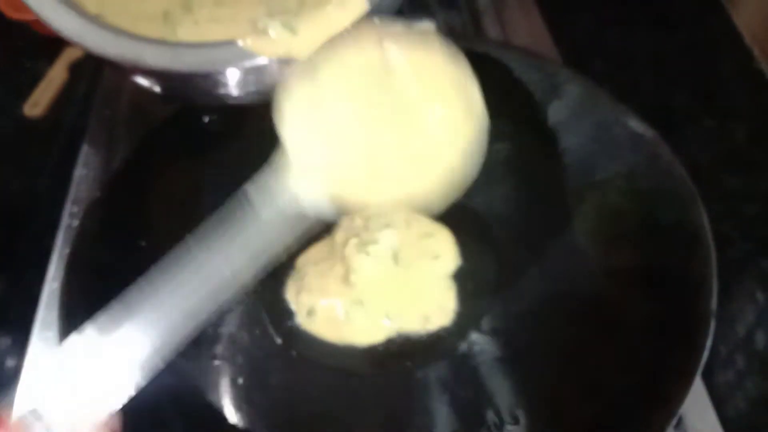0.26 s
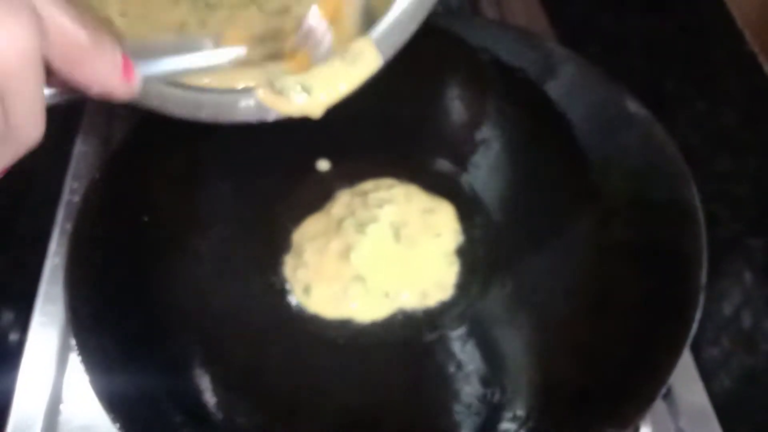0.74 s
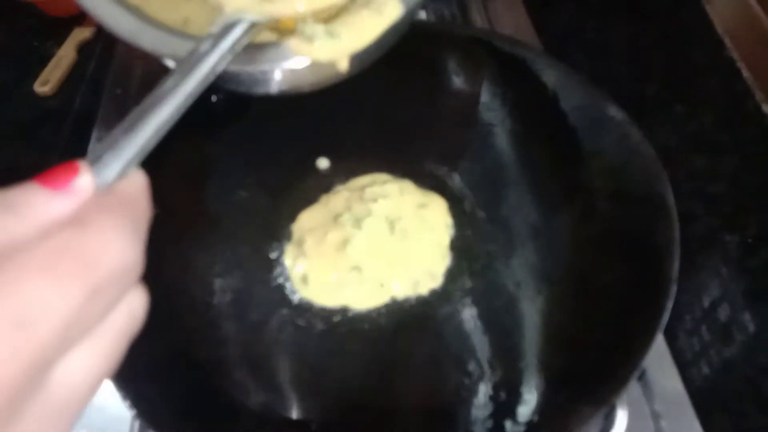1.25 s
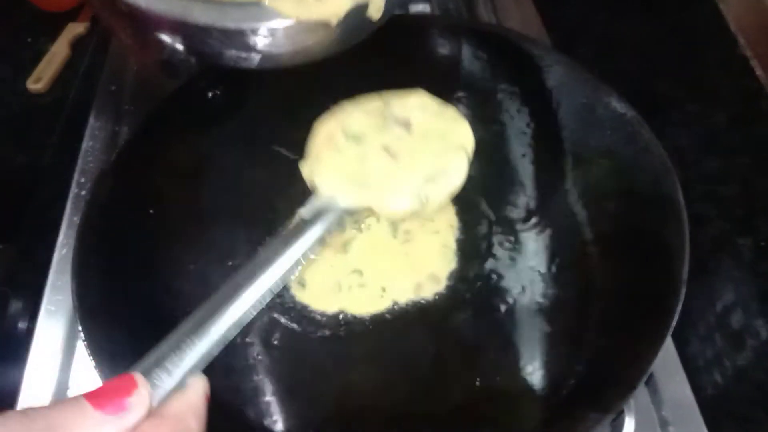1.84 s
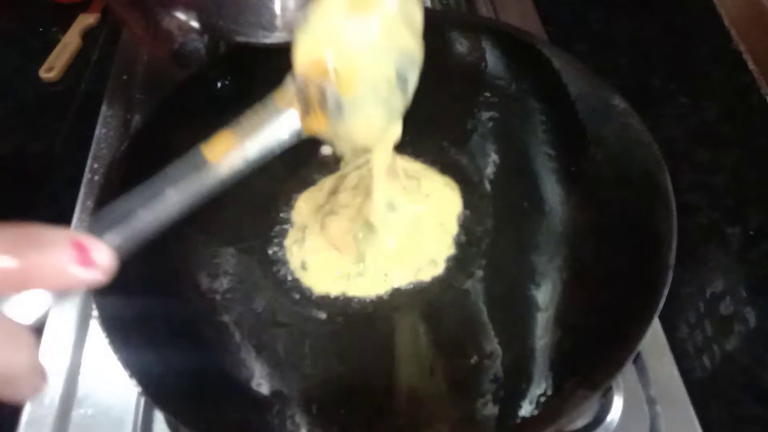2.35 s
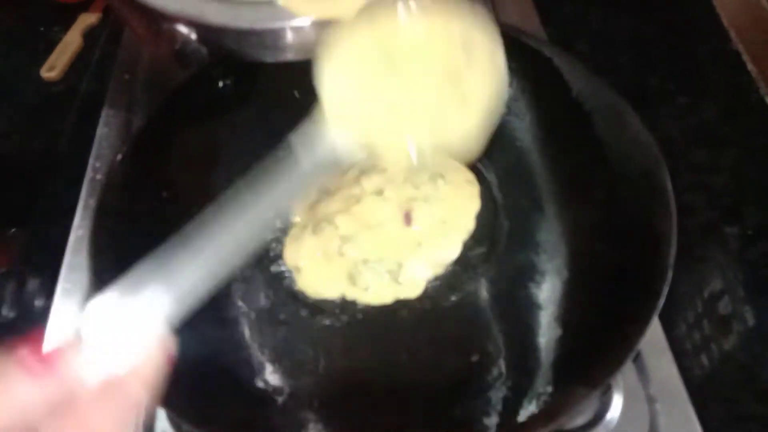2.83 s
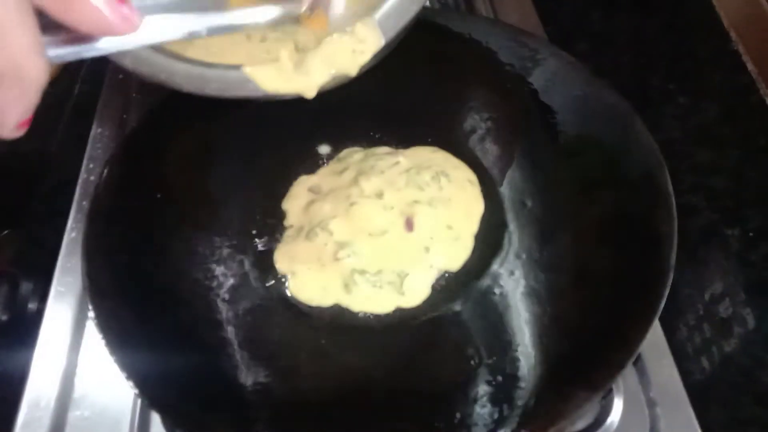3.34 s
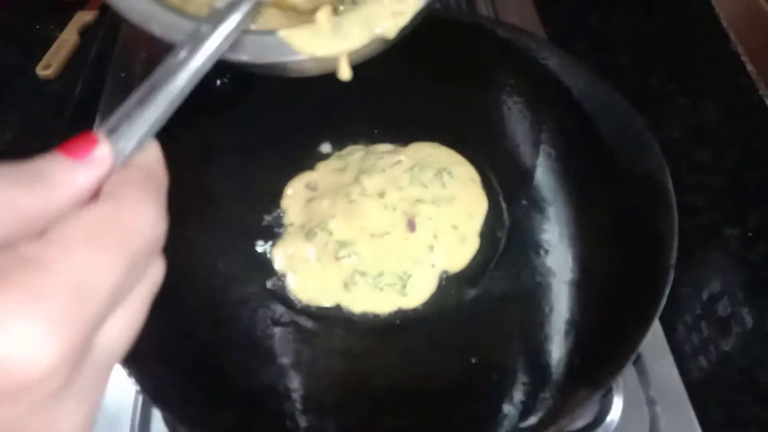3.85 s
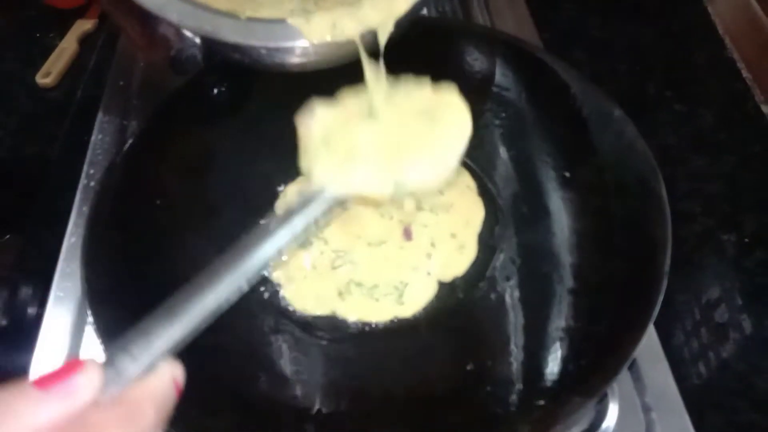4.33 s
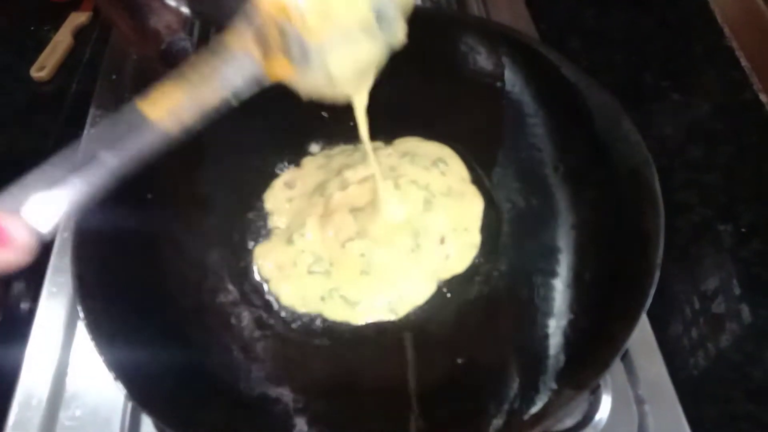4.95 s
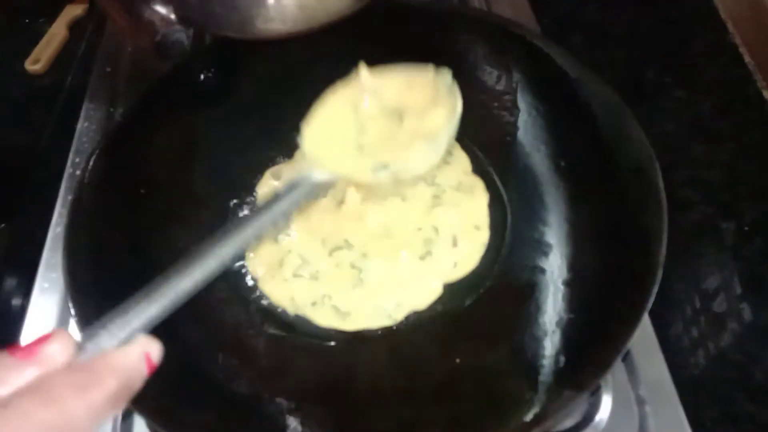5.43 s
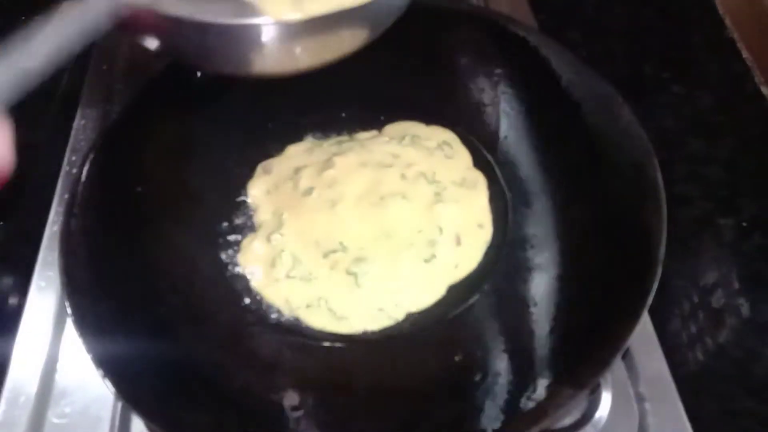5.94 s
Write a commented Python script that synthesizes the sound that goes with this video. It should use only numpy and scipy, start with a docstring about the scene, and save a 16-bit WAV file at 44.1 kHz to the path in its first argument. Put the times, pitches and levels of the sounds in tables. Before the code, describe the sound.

Throughout, batter sizzles in hot oil on an iron pan, a grainy bright hiss full of tiny crackles, strongest at the start, swelling again near 1.6 s and then thinner. Sharp wet pops and small pan ticks scatter irregularly. Thin bangles tinkle from 0.1 to 0.4 s, high and delicate. Short gritty scrapes of a steel ladle on a steel bowl run from 0.7 to 1.1 s, with a knock at 0.8, and again from 1.3 to 1.6, ending in a clack. Frying continues alone until a clear bangle clink at 2.8 s. A bright ringing clank comes at 3.5 s, a faint bangle touch at 4.0, a hard, loud clack at 5.5 and a close double clang at about 6.2, at the very end. A soft flame rumble and brief faint hums lie underneath. Close, nearly mono, squeezed at loud hits, with short hard kitchen echoes.

```python
"""Batter frying in a kitchen

Batter fries in hot oil on an iron pan: dense random clicks make the steam fizz, short tones the bubbles.
A steel ladle knocks and scrapes a steel bowl and thin bangles tinkle, all built from dying modes.
A gas flame rumbles below as filtered noise, and a faint low hum, noise in one resonance, comes and goes.
Hard kitchen walls add a short tail of echoes, and a limiter squeezes the loudest moments."""
import sys
import numpy as np
from scipy import signal
from scipy.io import wavfile
from scipy.ndimage import uniform_filter1d

SR = 44100
rng = np.random.default_rng(int(sys.argv[2]) if len(sys.argv) > 2 else 0)


def to_wav(sig):
    """Store sig (one row per channel, or 1-D mono) as 16-bit WAV at the path in sys.argv[1].

    Samples outside -1..1 are clipped; the rate is SR.
    """
    pcm = np.clip(np.atleast_2d(sig), -1, 1) * 32767
    pcm = np.round(pcm).astype(np.int16)
    wavfile.write(sys.argv[1], SR, pcm.T)  # frames by channels


N = 272493  # length in samples


def gain_of(db):
    """Turns decibels into an amplitude factor."""
    return 10 ** (np.asarray(db) / 20)


def evened(x):
    """Scales to rms 1."""
    return x / np.sqrt(np.mean(x ** 2) + 1e-20)


def peaked(x, db):
    """Scales to a peak level in dB."""
    return gain_of(db) * x / abs(x).max()


def read(points, hz):
    """Reads a curve of (frequency, value) points on a log-frequency axis."""
    point_hz, value = np.transpose(points)
    return np.interp(np.log(hz + 1), np.log(point_hz + 1), value)


def add(mix, s, sound):
    """Mixes a sound in at a time in seconds."""
    part = mix[max(round(s * SR), 0):][:len(sound)]
    part += sound[:len(part)]


def band(x, lo_hz, hi_hz):
    """Steep band-pass."""
    return signal.sosfilt(signal.butter(3, [lo_hz, hi_hz], "band", fs=SR, output="sos"), x)


def coloured(x, points):
    """Filters causally, with the minimum phase of a dB spectrum."""
    spectrum_db = np.maximum(read(points, np.fft.rfftfreq(4096, 1 / SR)), -90)
    half = np.log(gain_of(spectrum_db))
    log_gain = np.r_[half, half[-2:0:-1]]
    # the Hilbert transform of the log gain gives the minimum phase
    taps = np.fft.ifft(np.exp(log_gain - 1j * signal.hilbert(log_gain).imag)).real[:2048]
    return signal.oaconvolve(x, taps)[:len(x)]


def patchy(x, patch_db):
    """Raises and lowers small patches of time and frequency at random."""
    z = signal.stft(x, nperseg=512)[2]
    patches = uniform_filter1d(rng.standard_normal(z.shape), size=10, axis=0)
    patches = uniform_filter1d(patches, size=8, axis=1)
    return signal.istft(z * gain_of(patch_db * evened(patches)), nperseg=512)[1][:len(x)]


def ring(hz, t60, seconds, phase=0):
    """One mode dies by 60 dB in t60 seconds; phase is in turns."""
    t = np.arange(int(seconds * SR)) / SR
    return gain_of(-60 * t / t60) * np.sin(2 * np.pi * (hz * t + phase))


def clicks(per_s, spread_db):
    """Random clicks of either sign, a few of them large."""
    size = gain_of(spread_db * np.minimum(rng.exponential(1, N), 3.5))
    return size * rng.choice([-1, 1], N) * (rng.random(N) < per_s / SR)


# Reverb time of the hard-walled kitchen: (frequency [Hz], t60 [s])
KITCHEN_T60 = [(300, 0.36), (1500, 0.64), (6000, 0.34), (15000, 0.29)]
WET_DB = -8


def kitchen(x):
    """Sparse echoes of random sign, each band dying at its own speed."""
    taps = np.zeros(SR // 2)
    slots = np.arange(60, len(taps) - 20, 20)  # one echo at a random place in each slot
    taps[slots + rng.integers(0, 20, len(slots))] = rng.choice([-1., 1.], len(slots))
    hz, t, z = signal.stft(taps, SR, nperseg=256)
    decay = gain_of(-60 * t / read(KITCHEN_T60, hz)[:, None])
    tail = signal.istft(z * decay, SR, nperseg=256)[1]
    return signal.fftconvolve(x, tail / np.linalg.norm(tail))[:N]


# Colour of the burner's roar: (frequency [Hz], relative density [dB per Hz])
FLAME_COLOUR = [(18, -44), (30, -32), (43, -6), (97, 0.5), (228, -9.5), (430, -12.5), (490, -4), (552, -13),
                (700, -4), (910, -31.5), (1540, -120)]
FLAME_DB = -71  # rms


def flame():
    """Filtered noise makes the low soft roar of the burner."""
    return gain_of(FLAME_DB) * evened(coloured(rng.standard_normal(N), FLAME_COLOUR))


# Swells of the hum: (time of the top [s], level added [dB], time from the top to 1/e [s])
HUM_SWELLS = [(0.82, -64, 0.041), (1.886, -77, 0.044), (2.123, -71, 0.084), (2.597, -71, 0.025),
              (2.94, -81, 0.056), (3.535, -62, 0.021), (4.29, -68.5, 0.024), (4.406, -66.5, 0.036),
              (4.633, -75.5, 0.14), (5.192, -71, 0.019), (6.18, -64, 0.02)]
HUM_REST_DB = -86


def hum():
    """Noise in one low resonance, resting quietly between bell-shaped swells."""
    t = np.arange(N) / SR
    level = gain_of(HUM_REST_DB)
    for top_s, db, half_s in HUM_SWELLS:
        level = level + gain_of(db) * np.exp(-((t - top_s) / half_s) ** 2)
    resonance = ring(335.5, t60=0.087, seconds=.1)
    return level * evened(signal.oaconvolve(rng.standard_normal(N), resonance)[:N])


# Modes of a thin bangle: (frequency [Hz], t60 [s])
BANGLE_MODES = [(4436, .09), (8086, .07), (8463, .06), (8716, .12), (9300, .07), (13020, .08), (13590, .1),
                (14010, .09), (14560, .13), (15060, .15), (15430, .12)]
# Bangles touching: (time [s], peak level [dB], low centre [Hz], high centre [Hz], high against low [dB])
TINKLES = [(.126, -48, 8716, 13600, -7), (.182, -45, 8716, 13000, -29), (.251, -42.5, 8350, 13020, -14),
           (.301, -60, 8716, 13590, -2), (.368, -51, 9300, 14000, -20), (.387, -35.5, 8500, 13600, -10),
           (0.391, -37.5, 4436, 9300, -15), (0.407, -41, 8716, 14560, -4), (2.792, -29.5, 8716, 14700, 0),
           (3.992, -48.5, 8716, 14010, -27)]


def tinkles():
    """Each touch rings the modes near two pitches; a second bangle is tuned slightly apart."""
    out = np.zeros(N)
    rise = np.minimum(np.arange(int(.25 * SR)) / SR / .001, 1)
    for s, db, low_hz, high_hz, high_db in TINKLES:
        touch = 0
        for hz, t60 in BANGLE_MODES:
            low_share = gain_of(-abs(hz / low_hz - 1) * 170)
            high_share = gain_of(high_db - abs(hz / high_hz - 1) * 190)
            twin_hz = hz * (1 + 0.01 * rng.standard_normal())
            pair = ring(hz, t60, .25) + 1.1 * ring(twin_hz, t60, .25)
            touch = touch + (low_share + high_share) * pair
        add(out, s, peaked(touch * rise, db))
    return out


SPLIT = .009  # pitch shift of a neighbour, as a share, at a random shift of 1
NEIGHBOUR_DB = -10  # neighbour against its mode at a shift of 1, before a random change


def struck(modes, length=1, tilt_db=0):
    """All modes of a steel body after one blow; dents split each into close, shorter-lived neighbours."""
    out = np.zeros(int(.6 * SR))
    for hz, db, t60 in modes:
        tilted_db = db - tilt_db * np.log2(hz / 3500)
        for shift, split_db, phase in [(0, 0, 0), *rng.uniform(-1.07, 1, (3, 3))]:
            life = t60 * length * (1 - 0.55 * abs(shift))
            mode = ring(hz * (1 + SPLIT * shift), life, life, phase)[:len(out)]
            mode_db = tilted_db + NEIGHBOUR_DB * abs(shift) ** .5 + 0.79 * split_db
            add(out, 0, gain_of(mode_db) * mode)
    return out


# Modes of the steel bowl, free and untilted: (frequency [Hz], relative level [dB], t60 [s])
BOWL_MODES = [(781, 7, .36), (915, 1, .26), (1206, -17, .35), (1480, -18, .4), (1766, -17, .4),
              (2353, -18, .45), (2589, -12, .45), (3350, -8, .28), (3463, 4, 1.3), (4654, -12, .33),
              (4861, -5, .3), (5310, -7, .36), (5500, -4, .37), (5830, -4, .35), (6105, 1, .3),
              (7090, -6, .33), (7241, -9, .33), (8600, -26, .25), (11730, -37, .25)]
# Colour of crowded modes in thin steel, also in the knocks:
# (frequency [Hz], relative density [dB per Hz])
CRASH_COLOUR = [(600, -28), (800, -14), (1250, -17.5), (3000, -23), (3470, -19), (4100, -14.5), (5000, -5),
                (6100, 1), (7300, -0.5), (8500, -36), (10500, -33.5), (13000, -44), (15200, -25),
                (16500, -82)]
# Ladle dragged along the bowl: (start [s], length [s], ring level [dB],
# low grit, middle grit and high grit against the ring [dB])
SCRAPES = [(0.703, 0.013, -60, -6, -1, 10), (.731, 0.059, -66, -1, 4, 8), (.80, 0.026, -50, -4, -3, 7),
           (.853, 0.021, -52.5, -9, -12, 11.5), (0.993, 0.058, -66, 2.5, 2.5, 14.5),
           (1.275, 0.024, -53.5, -13, 0, 3.5), (1.384, 0.046, -52.5, -4.5, 3, 0),
           (1.44, 0.059, -56.5, 0.5, -11, -9), (1.518, 0.019, -45, -10, -29, -2),
           (1.575, 0.01, -38, -16.5, -19, 5.5)]
SCRAPE_RISE_S, SCRAPE_FADE_DB_PER_S = 0.0029, 505
SUNG_DB, SUNG_T60 = -15, 0.19  # peak of the longest mode against the ring level [dB], its decay [s]


def scrapes():
    """Uneven slips of steel on steel drive the damped bowl, and its longest mode sings on."""
    out = np.zeros(N)
    damped = struck(BOWL_MODES, length=0.061)
    longest_hz = max(BOWL_MODES, key=lambda mode: mode[2])[0]
    for s, length, level_db, low_db, middle_db, high_db in SCRAPES:
        t = np.arange(0, length + 0.034, 1 / SR)
        slips = clicks(1200, spread_db=3)[:len(t)]
        body = signal.fftconvolve(slips, damped)[:len(t)]
        grit = evened(body) + 0.44 * evened(coloured(slips, CRASH_COLOUR))
        parts = evened(band(grit, 2300, 4160))  # the ring
        parts = parts + gain_of(low_db) * evened(band(body, 593, 920))
        parts = parts + gain_of(middle_db) * evened(band(body + 3 * slips, 1207, 1570))
        parts = parts + gain_of(high_db) * evened(band(grit, 4400, 9200))
        # each stroke rises, holds and fades
        fade = gain_of(-SCRAPE_FADE_DB_PER_S * np.maximum(t - length, 0))
        stroke = np.minimum(t / SCRAPE_RISE_S, 1) * fade
        add(out, s, parts * gain_of(level_db) * stroke)
        sung = signal.fftconvolve(slips * stroke, ring(longest_hz, SUNG_T60, 0.18))
        add(out, s, peaked(sung, level_db + SUNG_DB))
    return out


# Modes of the ladle, heard when it strikes deep in the bowl:
# (frequency [Hz], relative level [dB], t60 [s])
LADLE_MODES = [(1205, -3, 0.4), (2070, -6, .3), (3600, 5, .9), (4970, -7, 0.28), (5200, -10, 0.2),
               (6190, 4, .7), (7130, 5, .5), (7046, -2, 0.46), (8430, 3, .35), (8770, 5, 0.47),
               (9400, -2, 0.41), (10860, -32, .5)]
# Ladle against bowl: (time [s], peak level before the limiter [dB], ring length [factor],
# bass tilt [dB per octave], ladle, crash and thud against the bowl [dB], rise [s])
KNOCKS = [(.821, -21.5, 0.29, -1, -4.5, 0.5, -5.5, 0.00045), (1.5385, -31, 0.062, -3, -30, -2, -39, 0.0032),
          (3.507, -16.5, 0.99, 2, 8.5, 9, -5, 0.00055), (5.541, 5, 0.59, -7.5, -26, -3.5, -56, 0.0026),
          (6.166, -20.5, 1.8, 1, 3, 16, -12, 0.00057), (6.172, -7, .9, -4, -3, 9.5, -41, 0.00034)]


def knocks():
    """Bowl and ladle ring over a broad crash and a dull thud; the first instant of contact is loudest."""
    out = np.zeros(N)
    t = np.arange(int(.6 * SR)) / SR
    for s, db, length, tilt_db, ladle_db, crash_db, thud_db, rise in KNOCKS:
        instant = np.exp(-(t / (0.0077 + 2 * rise)) ** 2)
        crash_noise = rng.standard_normal(len(t)) * gain_of(-60 * t / (0.9 * length))
        crash = coloured(crash_noise, CRASH_COLOUR)
        crash = crash + 2.4 * instant * band(crash, 8030, 15300)  # the extra top is gone at once
        thud = band(rng.standard_normal(len(t)) * gain_of(-60 * t / .07), 620, 1450)
        metal = peaked(struck(BOWL_MODES, length, tilt_db), 0)
        metal = metal + peaked(struck(LADLE_MODES, length), ladle_db) + peaked(crash, crash_db)
        contact = np.sin(np.pi / 2 * np.minimum(t / rise, 1)) ** 2 * (1 + 37.0 * instant)
        knock = band(metal * contact, 670, 21000) + peaked(thud, thud_db) * contact
        add(out, s, peaked(knock, db))
    return out


PAN_HZ = 1258


def bubble(hz, cycles):
    """A bubble rings a few cycles as it bursts, starting softly."""
    t = np.arange(int(.01 * SR)) / SR
    return ring(hz, 3 * cycles / hz, .01) * np.tanh(t * hz / .7)


# How hard the batter boils: (time [s], fizz level before flutter [dB], treble lift above 9 kHz [dB])
BOIL = [(0.0, -43.5, -2), (0.27, -48.5, 1), (0.45, -51.5, -1), (1.19, -54.5, -4), (1.58, -48.5, -0.5),
        (1.93, -50.5, -2), (2.68, -49, -26), (3.32, -55, -8), (4.18, -55, 5), (5.09, -52, -7),
        (5.42, -54, 1), (5.71, -53, -17), (5.92, -54.5, 9), (6.18, -54.5, -10)]
# Colour of steam at a small microphone, also in the pops:
# (frequency [Hz], relative density [dB per Hz])
FIZZ_COLOUR = [(300, -31), (550, -24.5), (880, -3), (1090, -10.5), (1250, -3.5), (1450, -1.5), (2800, -4.5),
               (4250, 0.5), (6100, 5), (6650, 2.5), (7300, 5.5), (8500, -13), (10200, -25), (13400, -29.5),
               (15400, -12.5), (15900, -52)]
CRACKLE_DB, CRACKLE_PER_S, SPRAY_PER_S = -13.5, 400, 5000  # small bubbles against the spray, rates
CRACKLE_LAG = 0.11  # dB that the crackle falls behind for each dB that the fizz swells


def sizzle():
    """Dense spray of tiny bursts plus scattered small bubbles, swelling with the boil."""
    s, level_db, treble_db = np.transpose(BOIL)
    t = np.arange(N) / SR
    boil_db = np.interp(t, s, level_db)
    flutter = uniform_filter1d(rng.standard_normal(N), size=900)
    flutter = evened(uniform_filter1d(flutter, size=900))
    spray = evened(clicks(SPRAY_PER_S, spread_db=3.0)) + 0.68 * rng.standard_normal(N)
    small = 0
    for hz in np.geomspace(1800, 9000, num=8):
        bursts = clicks(CRACKLE_PER_S / 8, spread_db=15.0)
        small = small + signal.oaconvolve(bursts, bubble(hz, cycles=0.82) * np.sqrt(hz))[:N]
    crackle_db = CRACKLE_DB - CRACKLE_LAG * (boil_db - level_db.mean())
    fizz = evened(spray) + gain_of(crackle_db) * evened(small)
    fizz = evened(coloured(fizz, FIZZ_COLOUR))
    pan = evened(signal.oaconvolve(fizz, ring(PAN_HZ, 0.06, .1))[:N])
    fizz = fizz + gain_of(-14.5) * pan  # the boil rings the pan
    fizz = patchy(fizz, patch_db=3)
    high = signal.sosfilt(signal.butter(4, 9000, "high", fs=SR, output="sos"), fizz)
    fizz = fizz + (gain_of(np.interp(t, s, treble_db)) - 1) * high
    return fizz * gain_of(boil_db + 0.95 * flutter)


# Single pops and pan ticks at set times: (time [s], peak level before the limiter [dB], pitch [Hz],
# treble snap rms against the peak [dB], pan ring against the peak [dB])
POPS = [(0.0944, -22, 5100, -58, -40), (0.174, -27, 6150, -37, -38), (0.4228, -22, 6950, -38, -38),
        (0.63, -30.5, 5500, -37, -20), (0.7052, -29.5, 5290, -39, -19), (0.7305, -23, 3400, -32, -16.5),
        (0.744, -33, 4270, -40, -32), (0.7608, -28.5, 1300, -39, -22), (0.7767, -20, 4970, -53, -35),
        (1.0024, -43.5, 6190, -15, -15), (1.1711, -35, 6230, -36, -15), (1.183, -28.5, 4960, -48, -30),
        (1.3004, -26, 4700, -29, -14), (1.5545, -33, 5700, -45, -30), (1.6507, -42, 3500, -46, 0.5),
        (1.775, -32.5, 1370, -31, -15), (1.8445, -43.5, 3000, -35, 1), (1.8994, -30, 5770, -45, -30),
        (1.9156, -26.5, 5760, -57, -30), (1.9617, -40, 3500, -40, -6), (2.0146, -32, 4560, -38, -12),
        (2.084, -32, 7440, -41, -9), (2.149, -29, 7550, -42, -20), (2.2195, -30.5, 1300, -28, -12),
        (2.3248, -20.5, 6140, -33, -47), (2.3883, -32, 7370, -43, -28), (2.4445, -32.5, 2800, -45, -22),
        (2.4527, -24.5, 7150, -37, -43), (2.4752, -30, 5640, -25, -23), (2.5174, -24, 7400, -34, -30),
        (2.6828, -28, 5500, -35, -15), (2.6975, -29.5, 5700, -22, -19), (2.756, -19, 5800, -31.5, -44),
        (2.9599, -24, 6700, -18.5, -60), (3.0415, -32, 5850, -18.5, -34), (3.1344, -28, 5600, -34, -39),
        (3.1405, -27.5, 5800, -21, -39), (3.2305, -43, 5380, -10, -31), (3.2451, -27, 5900, -35, -24),
        (3.2576, -31, 6200, -21, -32), (3.3174, -38.5, 7140, -18, -17), (3.392, -36, 5560, -22, -14.5),
        (3.6628, -24.5, 4460, -49, -30), (3.693, -20.5, 4240, -63, -23.5), (3.7977, -45, 7500, -46, -1),
        (3.9131, -20.5, 6600, -49, -47), (3.9206, -34, 6250, -43, -32), (3.932, -28.5, 5900, -37, -31),
        (3.971, -38.5, 6210, -16, -13), (4.1245, -30, 4450, -48, -25), (4.2171, -31, 5960, -33, -28),
        (4.229, -30.5, 4200, -58, -38), (4.2843, -29, 3830, -44, -50), (4.3108, -30.5, 5860, -32, -46),
        (4.3642, -39, 1310, -36, -20), (4.4184, -38, 5120, -23, -15), (4.4462, -26.5, 4060, -37, -13.5),
        (4.4547, -23.5, 7800, -49, -37), (4.491, -27.5, 5750, -47, -22), (4.5336, -21.5, 4480, -51, -43),
        (4.5914, -26.5, 4940, -55, -36), (4.6206, -31.5, 4700, -29, -46), (4.651, -36, 4670, -34, -18),
        (4.795, -41.5, 7500, -2.5, -39), (4.8196, -33, 7500, -32, -45), (4.8899, -29.5, 3070, -40, -25),
        (4.9617, -25, 3930, -34, -25), (5.0054, -27, 5800, -30, -43), (5.0411, -25.5, 6900, -26, -46),
        (5.0843, -36, 7260, -22, -31), (5.1596, -31.5, 5860, -32, -29), (5.2017, -29, 3600, -44, -25),
        (5.2149, -35.5, 1310, -50, -6), (5.4226, -27, 6600, -38, -41), (5.796, -40, 1900, -53, -9),
        (5.8185, -29, 5300, -52, -35), (5.841, -33.5, 6800, -41, -39), (5.8701, -21.5, 6100, -20, -53),
        (5.9388, -31, 3000, -46, -13.5), (5.976, -37, 7440, -25, -16), (6.0481, -32.5, 7600, -36, -16)]
# Treble of a burst: (frequency [Hz], relative density [dB])
SNAP_COLOUR = [(8000, 3), (10000, -9.5), (13000, -20), (15200, -3.5), (15650, -15), (15950, -55)]
PAN_T60, PAN_SPREAD = 0.04, .03  # seconds; random detuning of each spot of the pan, as a share
# stray pops at random times: count, least peak [dB] and its spread [dB], pitch range [Hz]
STRAYS, STRAY_DB, STRAY_SPREAD_DB, STRAY_LOW_HZ, STRAY_HIGH_HZ = 36, -39.5, 3, 1940, 7750
STRAY_SNAP_DB, STRAY_PAN_DB = -34, -20.5  # middle of their ranges, against the peak


def stray_pops():
    """Bubbles burst at random times, in the same columns as the pops at set times."""
    strays = []
    for when, size, pitch, snap, pan in rng.random((STRAYS, 5)):
        db = STRAY_DB + STRAY_SPREAD_DB * np.log(1 / max(size, .1))
        hz = STRAY_LOW_HZ * (STRAY_HIGH_HZ / STRAY_LOW_HZ) ** pitch
        snap_db, pan_db = STRAY_SNAP_DB + 14 * (snap - .5), STRAY_PAN_DB + 16 * (pan - .5)
        strays.append((when * N / SR, db, hz, snap_db, pan_db))
    return strays


def pops():
    """Each burst is a short tone, a bright snap of steam and a knock that rings the pan."""
    out = np.zeros(N)
    fade = gain_of(-60 * np.arange(1200) / SR / 0.037)
    steep = signal.butter(4, 9000, "high", fs=SR, output="sos")
    for s, db, hz, snap_db, pan_db in stray_pops() + list(POPS):
        puff = rng.standard_normal(len(fade)) * fade
        body = 0.19 * puff
        add(body, 0, bubble(hz, cycles=3.6))
        add(out, s, peaked(band(coloured(body, FIZZ_COLOUR), 0.35 * hz, 8800), db))
        # the snap dies a little more slowly than the puff; its rms is taken over 8 ms
        snap = signal.sosfilt(steep, coloured(puff / fade ** 0.11, SNAP_COLOUR))
        add(out, s, gain_of(db + snap_db) * snap / np.std(snap[:int(.008 * SR)]))
        spot_hz = PAN_HZ * (1 + PAN_SPREAD * rng.standard_normal())
        add(out, s, gain_of(db + pan_db) * ring(spot_hz, PAN_T60, .05))
    return out


# Part of the background unlike in the two channels: (frequency [Hz], level against the background [dB])
UNLIKE_COLOUR = [(60, -28), (180, -13), (550, -12), (1650, -21.5), (4970, -50.5), (15000, -69)]


def scene():
    """One mix feeds both channels; only a faint noise, of opposite sign in each, differs."""
    fizz = sizzle()
    near = fizz + pops() + tinkles() + knocks() + scrapes() + hum()
    # a fresh flame and the fizz shifted by 2000 samples
    unlike = coloured(flame() + np.roll(fizz, 2000), UNLIKE_COLOUR)
    mid = near + gain_of(WET_DB) * kitchen(near) + flame()
    return np.array([mid + unlike, mid - unlike])


FALL_DB_PER_S = 397  # how fast the limiter's held level falls
NOTCH_HZ, NOTCH_WIDTH_HZ, NOTCH_SHARE = 6610, 440, 0.94  # a dip in the microphone's response
EDGE_HZ = 16600  # top of the band


def record(dry):
    """A quick limiter looks a few milliseconds ahead; then microphone colour and band limit."""
    power = uniform_filter1d((dry ** 2).mean(0), size=130)
    power_db = 10 * np.log10(abs(power) + 1e-12)
    fall = np.arange(N) * FALL_DB_PER_S / SR
    level_db = np.maximum.accumulate(power_db + fall) - fall  # jumps up, falls steadily
    over_db = np.maximum(level_db + 23.5, 0)  # the threshold is -23.5 dB
    over_db = uniform_filter1d(over_db, size=700)  # a centred mean, so it acts ahead of a peak
    held = dry / gain_of(0.65 * over_db)
    notch = signal.iirpeak(NOTCH_HZ, NOTCH_HZ / NOTCH_WIDTH_HZ, SR)
    held = held - NOTCH_SHARE * signal.lfilter(*notch, held)
    held = signal.sosfilt(signal.butter(3, 52, "high", fs=SR, output="sos"), held)
    held = held * np.minimum(np.arange(N)[::-1] / 60, 1)  # the sound stops without a click
    edge = signal.firwin(511, EDGE_HZ, window=("kaiser", 9), fs=SR)
    return signal.oaconvolve(held, edge[None], "same")


dry = scene()
out = record(dry)
to_wav(out)
```